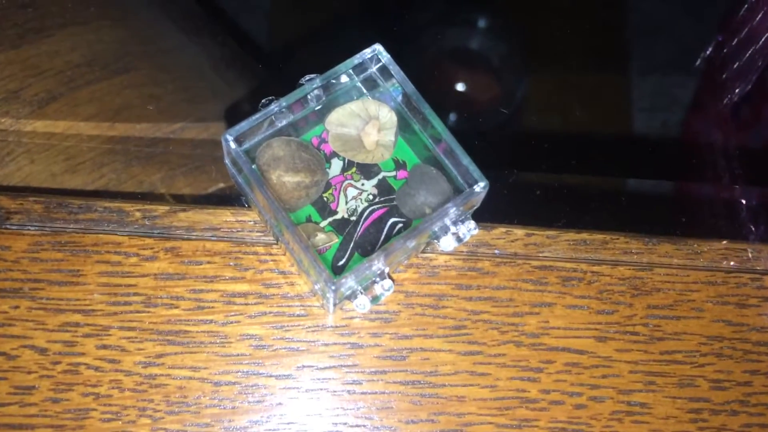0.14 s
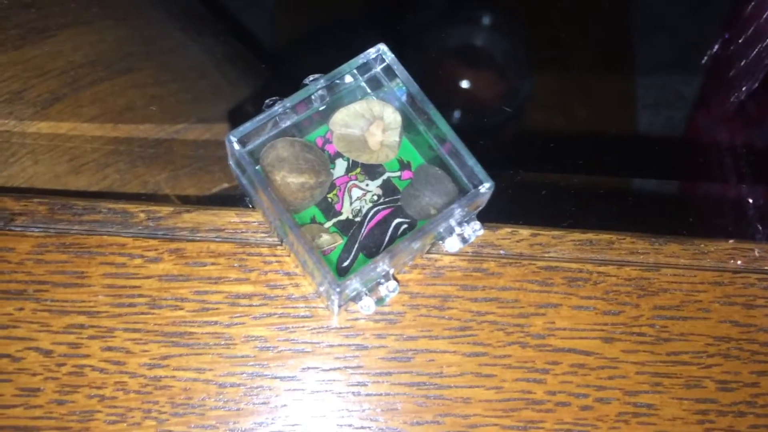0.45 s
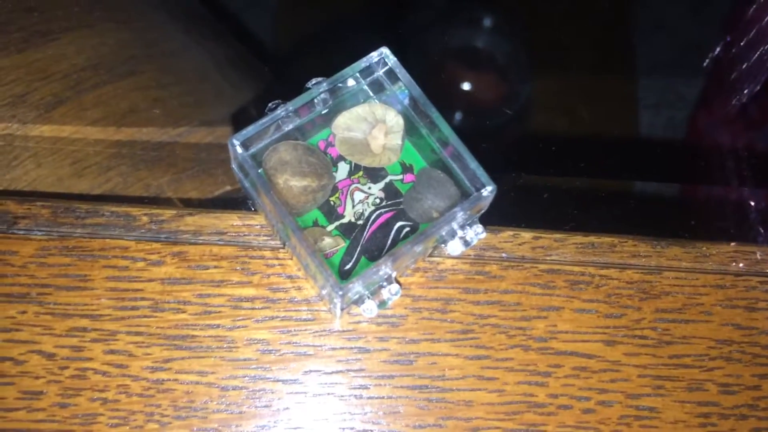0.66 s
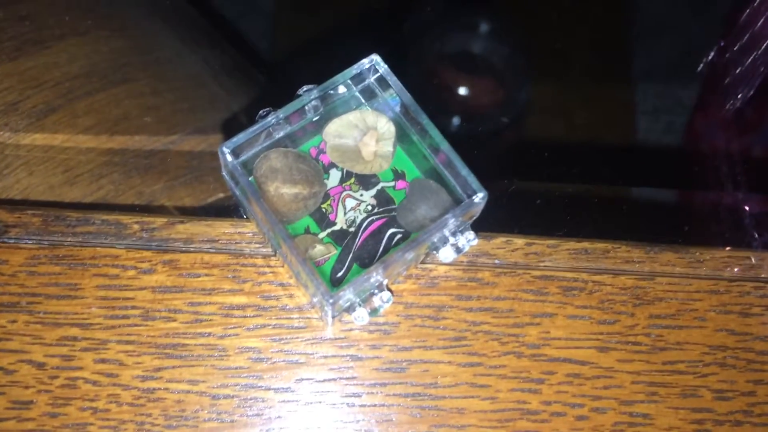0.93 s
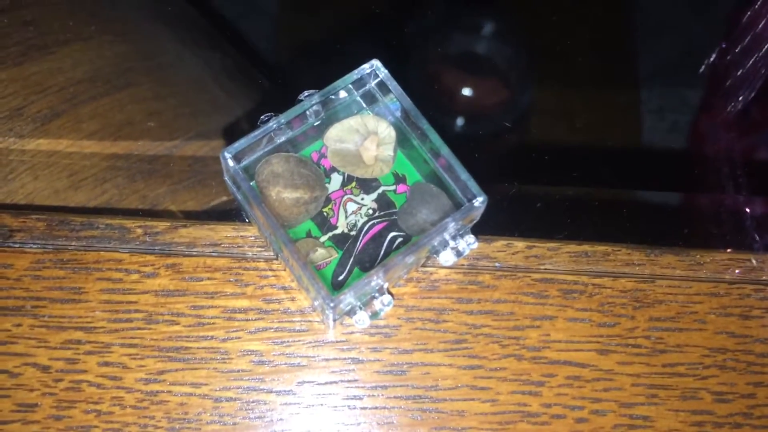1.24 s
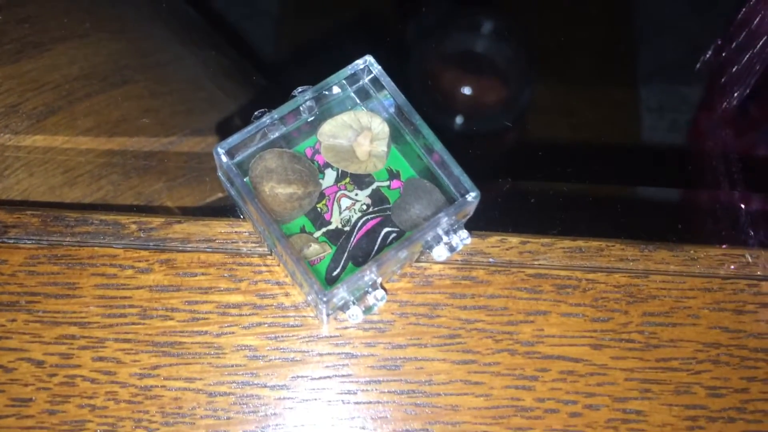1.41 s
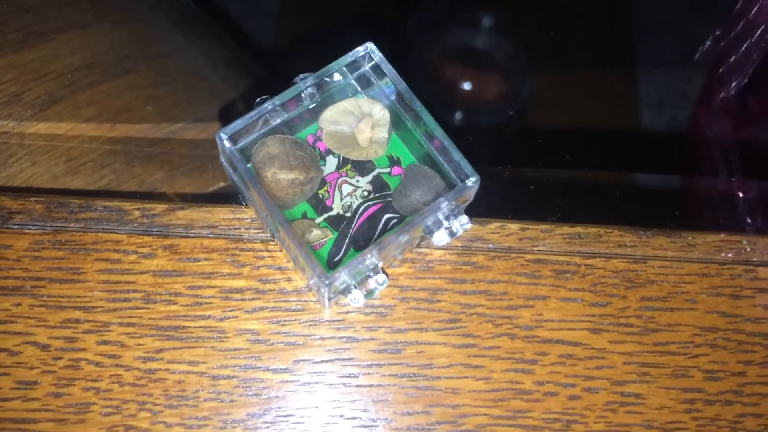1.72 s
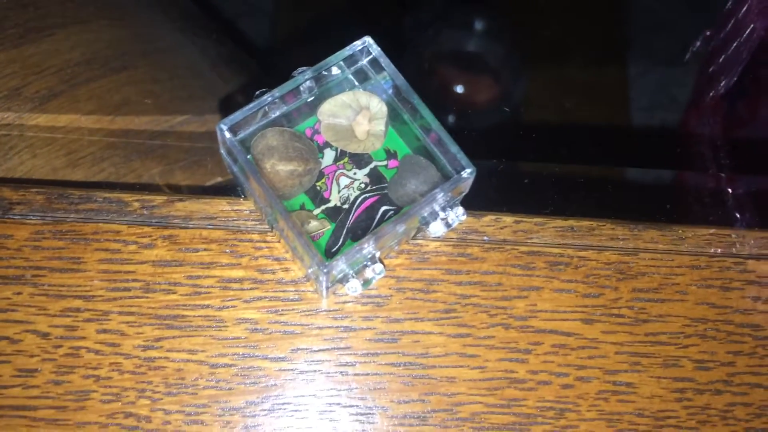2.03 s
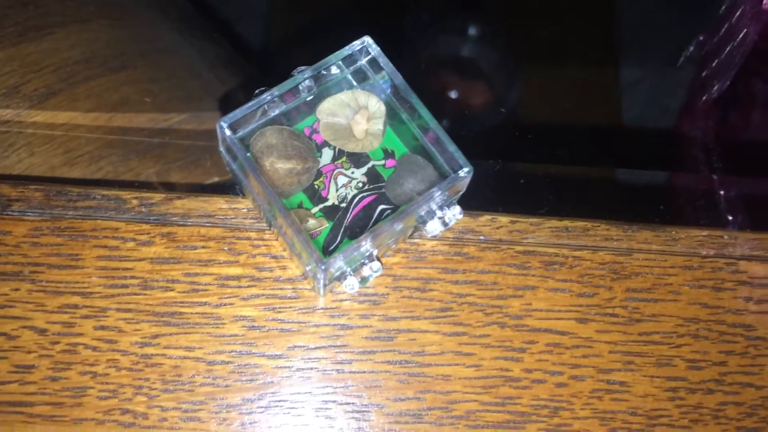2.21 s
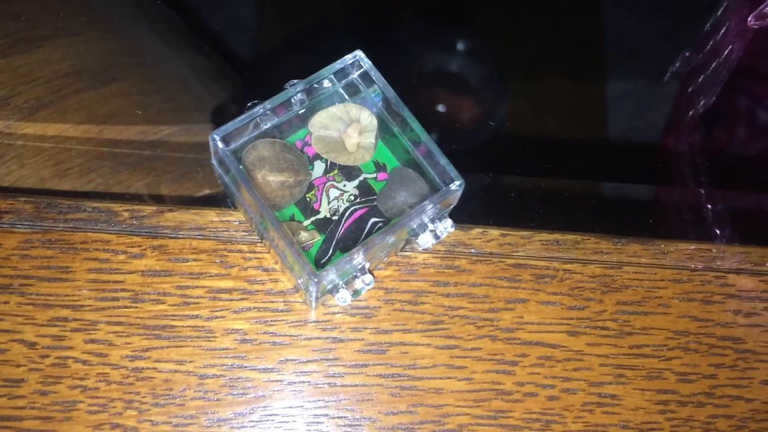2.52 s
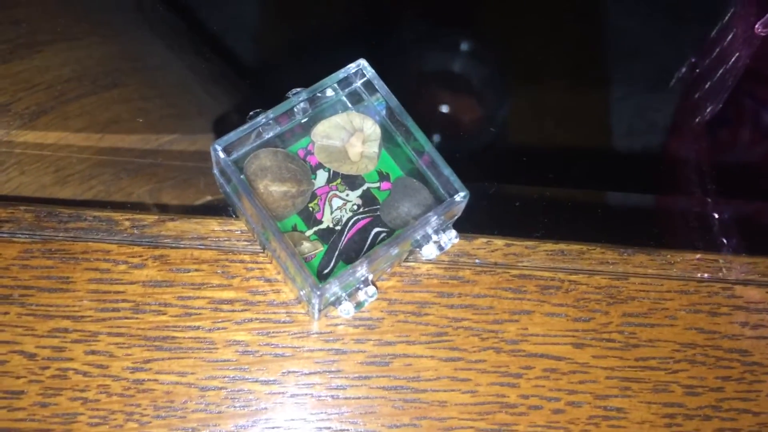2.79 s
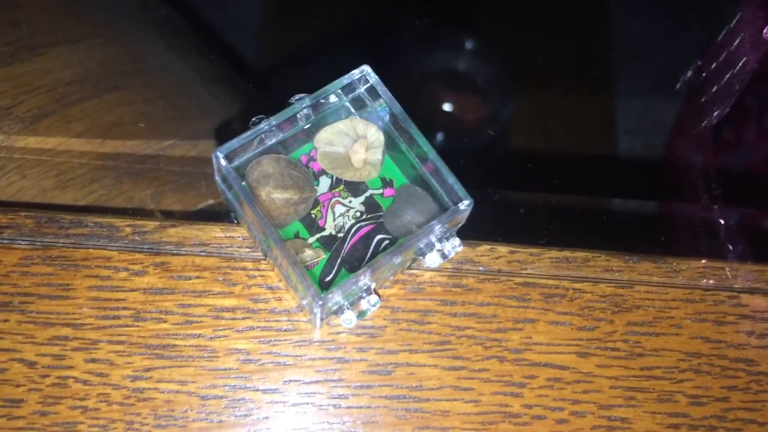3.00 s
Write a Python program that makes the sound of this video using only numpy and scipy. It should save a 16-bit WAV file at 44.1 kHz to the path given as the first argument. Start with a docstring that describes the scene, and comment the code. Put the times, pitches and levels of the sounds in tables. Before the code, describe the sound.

Three tiny, bright double clicks of beans tapping a plastic box, over faint quiet room hum.

```python
"""Jumping beans in a plastic box

A small clear plastic box on a wooden table, heard from close by in mono; a bean twitches about once a second.
Each twitch is a double click: a bean tips against the plastic with a little chatter, then drops back
some 25 ms later and rings the box more fully. Clicks are shaped pulses with noise, the ring decaying sines.
Behind lies a quiet room: shaped noise for its air, wavering sine lines for the hum of an appliance."""
import sys
import numpy as np
from scipy import signal
from scipy.fft import rfft, irfft, next_fast_len
from scipy.io import wavfile
from scipy.ndimage import map_coordinates

SR = 44100
rng = np.random.default_rng(int(sys.argv[2]) if len(sys.argv) > 2 else 0)


def persist_wave(psi):
    """Save psi, clipped to +-1, as 16-bit WAV."""
    counts = np.round(np.clip(psi, -1, 1) * 32767).astype(np.int16)
    wavfile.write(sys.argv[1], SR, np.atleast_2d(counts).T)


N = 138915  # samples, 3.15 s

# Spectrum of the room air: f/Hz, relative density level/dB (AIR_DB sets the loudness)
AIR_SPECTRUM = [(20, -4), (38, -37.5), (54, 2.5), (75, -8), (92, -5.5), (115, -2), (180, -6.5), (260, -0.5),
                (350, -10.5), (550, -6), (750, -11), (1000, -11.5), (1400, -16), (1850, -17.5),
                (2300, -25.5), (3500, -30), (5000, -32), (8000, -37), (15000, -42)]
# Steady lines of the appliance: f/Hz, rms level/dB before HUM_DB is added
HUM_LINES = [(58.5, -63.5), (74, -67), (108, -70), (147, -65), (217, -59.5), (241, -68), (324, -69),
             (361, -74.5), (432, -77.5), (480, -70), (543, -68.5), (831, -77.5), (890, -69.5), (982, -71),
             (1128, -72), (1188, -80.5), (1782, -76)]
# A bean tips against the box: t/s, level/dB relative to one full tap
TIPS = [(.8712, -20.5), (.8802, -20), (.8829, -1.5), (1.8739, -19), (1.8762, -5), (1.8838, -5),
        (2.9526, -19), (2.9533, -2.5), (2.9631, -16), (2.9758, -26)]
# It drops back: t/s, level/dB relative to one full tap
DROPS = [(.9106, -2), (1.9007, -5.5), (1.9039, -15), (2.9769, -3)]
# Modes of the box: f/Hz, free t60/s, level on tipping/dB, level on dropping/dB (before RING_DB and scatter)
BOX_MODES = [(4390, .052, -39, -30), (4534, .036, -30.5, -34), (4920, .028, -35.5, -39),
             (6137, .055, -55, -47), (6905, .042, -48, -40), (7465, .025, -44, -29.5),
             (7725, .022, -39, -40), (8250, .022, -49, -56), (9720, .012, -39, -35), (10630, .02, -45, -50),
             (11650, .011, -41, -36), (12070, .02, -48, -50), (13950, .012, -62, -40)]
# Colour of the contact itself, tipping and dropping: f/Hz, relative level/dB
TIP_COLOUR = [(300, -34), (1400, -22), (2300, -13.5), (3000, -23), (3950, -14.5), (4800, 0), (6500, -4),
              (7800, -15), (8700, -16.5), (9700, -11), (12000, -6), (12800, -33), (14500, -33),
              (15300, -40)]
DROP_COLOUR = [(300, -36), (1800, -24.5), (2430, -2), (2800, -22.5), (3200, -7), (3700, -57), (4400, -19),
               (5600, -1.5), (7600, 1.5), (8600, -28), (9700, -9), (11800, -7.5), (12600, -11),
               (14000, -35), (15300, -35)]

AIR_DB = -54.5  # rms level
HUM_DB = 0.5  # added to every line
HUM_WAVER_DB, HUM_DRIFT_HZ = 1.52, 0.93  # scale of the random curves
CONTACT_DB = 1.5
RING_DB, RING_SCATTER_DB = 3, 1.0  # added to every mode; random spread per mode and contact
RING_ATTACK_S, RING_S = 0.00027, .3  # time constant of the onset; fixed length of every tap's ring
PRESSED_RING = .85  # share of the ring time left while a bean presses on the wall
FLUTTER_DB, FLUTTER_T60_S = -8, .016  # dense, quickly damped modes of walls and lid
ROOM_DB, ROOM_T60_S = -21, .125
RADIATES_ABOVE_HZ, RADIATION_ORDER = 4000, 6
TOP_HZ = 15400  # band limit of the recorder


def amp(db):
    """Decibels to gain."""
    return 10 ** (np.asarray(db) / 20)


def unit(x):
    """Scale to rms 1."""
    return x / np.sqrt(np.mean(x ** 2) + 1e-20)


def colour(points, size):
    """Gain on an FFT grid, interpolated in dB over log frequency."""
    f, db = np.transpose(points)
    grid = np.fft.rfftfreq(size, 1 / SR) + 1  # 1 Hz up, to avoid log(0)
    return amp(np.interp(np.log(grid), np.log(f), db))


def wobble(rate):
    """A smooth random curve through `rate` knots a second."""
    knots = rng.standard_normal(int(N * rate / SR) + 4)
    return map_coordinates(knots, [np.arange(N) * rate / SR])


def fade(t, t60):
    """Exponential decay by 60 dB in t60."""
    return np.exp(-np.log(1000) * t / t60)


def tail(t, t60):
    """Dying noise of energy 1."""
    noise = rng.standard_normal(len(t)) * fade(t, t60)
    return noise / np.linalg.norm(noise)


def air():
    """The soft, dull rush of the room: white noise shaped in frequency."""
    size = next_fast_len(N + 8192)
    spectrum = rfft(rng.standard_normal(size)) * colour(AIR_SPECTRUM, size)
    return amp(AIR_DB) * unit(irfft(spectrum, size)[:N])


def hum():
    """Appliance hum: sine lines that each waver a little in pitch and level."""
    out = np.zeros(N)
    for hz, db in HUM_LINES:
        pitch = hz + HUM_DRIFT_HZ * wobble(rate=7.954)
        phase = 2 * np.pi * (rng.random() + np.cumsum(pitch) / SR)
        waver = amp(HUM_WAVER_DB * wobble(rate=5.855))
        out += amp(db + HUM_DB) * unit(np.sin(phase) * waver)
    return out


def click(points, size=2048):
    """The sharpest causal pulse with a given colour (minimum phase)."""
    cepstrum = irfft(np.log(colour(points, size)))
    # fold the anticausal half onto the causal one
    cepstrum[1:size // 2] *= 2
    cepstrum[size // 2 + 1:] = 0
    return irfft(np.exp(rfft(cepstrum)))


def box_modes(t, ring_share):
    """Decaying sines of the box; so small a box radiates no bass, hence the high-pass."""
    hz, t60 = np.transpose(BOX_MODES)[:2, :, None]
    onset = 1 - np.exp(-t / RING_ATTACK_S)
    modes = np.sin(2 * np.pi * hz * t) * fade(t, t60 * ring_share) * onset
    highpass = signal.butter(RADIATION_ORDER, RADIATES_ABOVE_HZ, 'high', fs=SR, output='sos')
    return signal.sosfilt(highpass, modes)


def taps(events, contact_colour, mode_db, ring_share):
    """Each contact is a sharp click that rings the box and, faintly, the room."""
    out = np.zeros(N + SR)
    t = np.arange(int(RING_S * SR)) / SR
    modes = box_modes(t, ring_share)
    contact = click(contact_colour)
    for start, db in events:
        push = amp(FLUTTER_DB) * tail(t, FLUTTER_T60_S)
        push[0] += amp(CONTACT_DB)
        knock = signal.fftconvolve(push, contact)[:len(t)]
        scatter = RING_SCATTER_DB * rng.standard_normal(len(BOX_MODES))
        tap = knock + amp(RING_DB + mode_db + scatter) @ modes
        room = signal.fftconvolve(tap, tail(t, ROOM_T60_S))[:len(t)]
        tap = tap + amp(ROOM_DB) * room
        out[round(start * SR):][:len(t)] += amp(db) * tap
    return out[:N]


def beans():
    """Tipping and dropping strike the box at different spots, so they weight its modes differently."""
    tip_db, drop_db = np.transpose(BOX_MODES)[2:]
    tipping = taps(TIPS, TIP_COLOUR, tip_db, PRESSED_RING)
    dropping = taps(DROPS, DROP_COLOUR, drop_db, ring_share=1)
    return tipping + dropping


def scene():
    """The box close by, the room behind it, on one channel."""
    return (air() + hum() + beans())[None]


def record(dry):
    """The recorder keeps nothing above its band limit."""
    size = next_fast_len(N + SR // 2)
    kept = np.fft.rfftfreq(size, 1 / SR) < TOP_HZ
    return irfft(rfft(dry, size) * kept, size)[:, :N]


dry = scene()
out = record(dry)
persist_wave(out)
```